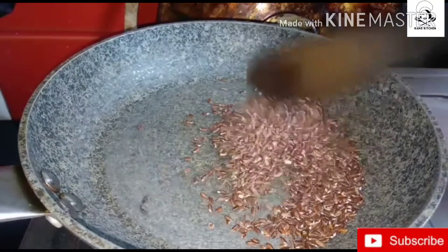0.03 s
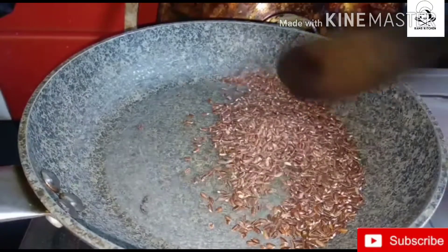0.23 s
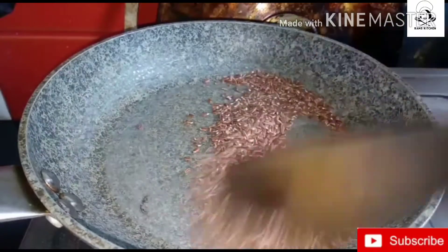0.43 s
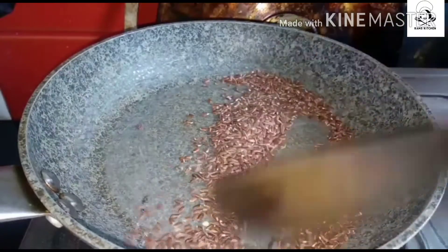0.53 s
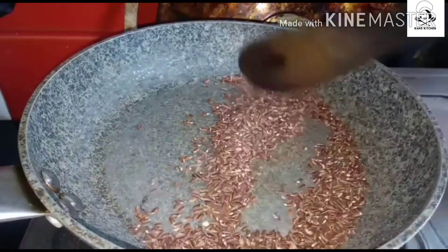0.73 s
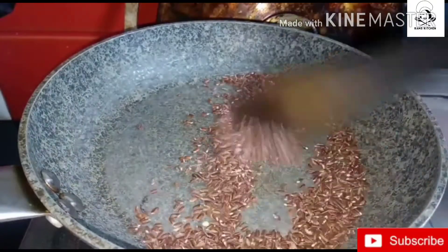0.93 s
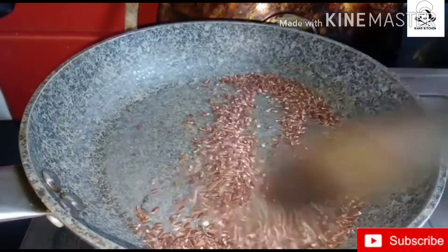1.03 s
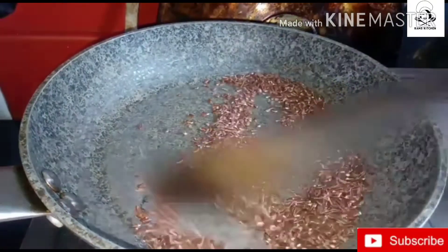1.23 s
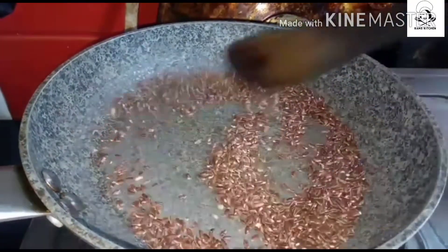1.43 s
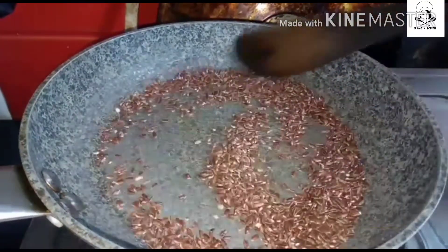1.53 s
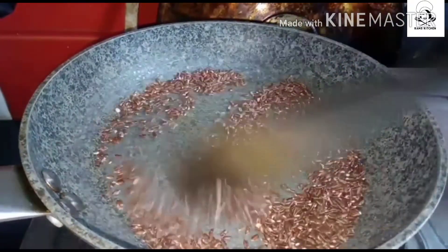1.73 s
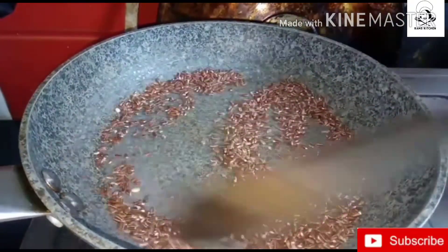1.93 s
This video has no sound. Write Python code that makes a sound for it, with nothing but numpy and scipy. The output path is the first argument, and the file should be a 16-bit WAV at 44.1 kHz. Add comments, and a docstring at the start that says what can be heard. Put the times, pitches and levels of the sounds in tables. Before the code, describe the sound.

A wooden spatula stirs dry grains in a metal pan, with gritty swishes and occasional knocks.

```python
"""Kitchen stove, close up: a wooden spatula stirs dry grains round a frying pan.
Each stroke sweeps a rush of tiny grain impacts over the metal while the blade scrapes the base,
at times squeaking or making one mode sing. Now and then the spatula knocks the ringing wall
or the damped base, and the pan rumbles on its support."""
import sys
import numpy as np
from scipy import signal
from scipy.fft import rfft, irfft
from scipy.io import wavfile
from scipy.ndimage import uniform_filter1d

SR = 44100
rng = np.random.default_rng(int(sys.argv[2]) if len(sys.argv) > 2 else 0)


def output_pcm(signal):
    """Save a mono or channel-first signal as 16-bit PCM at the path in sys.argv[1].

    Samples are clipped to [-1, 1] before scaling.
    """
    pcm = np.clip(np.atleast_2d(signal).T, -1, 1) * 32767
    wavfile.write(sys.argv[1], SR, np.round(pcm).astype(np.int16))


N = 88200
T = np.arange(N) / SR
HZ = np.fft.rfftfreq(N, 1 / SR)
FRICTION_RISE_S = 0.0079


def amp(db):
    """Decibels to gain."""
    return 10 ** (np.asarray(db) / 20)


def unit(x):
    """Scale to unit rms."""
    return x / np.sqrt(np.mean(x ** 2) + 1e-20)


def read(points, hz, column=1):
    """Interpolate a table column over log frequency."""
    columns = np.transpose(points)
    return np.interp(np.log(hz + 1), np.log(columns[0] + 1), columns[column])


def add(mix, start_s, sound):
    """Mix a sound in at start_s."""
    part = mix[max(round(start_s * SR), 0):][:len(sound)]
    part += sound[:len(part)]


def colour(x, gain):
    """Minimum-phase filter from a gain per bin; unit rms out."""
    cepstrum = irfft(np.log(np.maximum(gain, 1e-5)), N)
    fold = 1 + np.sign(N / 2 - np.arange(N))
    fold[0] = 1
    return unit(irfft(rfft(x) * np.exp(rfft(cepstrum * fold)), N))


def peaks(modes, order):
    """Gain per bin of a set of resonances; higher order, steeper skirts."""
    power = sum(amp(db) ** 2 / (1 + abs(2 * (HZ - hz) / width_hz) ** order) for hz, width_hz, db in modes)
    return np.sqrt(power)


def clicks(rate_per_s, spread_db):
    """Random impulses of uneven size."""
    size = amp(spread_db * np.minimum(rng.exponential(1, N), 4))
    return size * rng.choice([-1., 1.], N) * (rng.random(N) < rate_per_s / SR)


def decay(t, t60_s):
    """Unity until t = 0, then 60 dB down per t60_s."""
    return amp(-60 * np.maximum(t, 0) / t60_s)


def push(start_s, length_s, rise_s, t60_s):
    """Envelope of one push: rise, hold, decay."""
    return np.clip((T - start_s) / rise_s, 0, 1) * decay(T - start_s - length_s, t60_s)


def hum(gain):
    """Random vibration of narrow resonances at an even level."""
    phase = np.exp(2j * np.pi * rng.random(len(HZ)))
    x = unit(irfft(gain * phase, N))
    return x / np.sqrt(uniform_filter1d(x ** 2, size=1800))


def air():
    """Faint steady room noise."""
    # noise spectrum: freq_hz, density_db
    spectrum = [(20, -15), (100, -11.5), (400, -12.5), (1000, -16), (4000, -22.5), (16000, -23.5)]
    return amp(-76.5) * colour(rng.standard_normal(N), amp(read(spectrum, HZ)))


def reflections(x):
    """Short reverb off tiled walls."""
    tail = clicks(2000, spread_db=-5) * decay(T, t60_s=0.22) * (T > 0.008)
    return signal.fftconvolve(x, tail / np.linalg.norm(tail))[:N]


def support():
    """The pushed pan judders on the stove; each shift favours the low modes near its centre pitch."""
    # pan shifts: start_s, length_s, thud_db, rumble_db, centre_hz
    shifts = [(0, 0.018, -60.5, -50.5, 360), (.258, 0.065, -41, -39.5, 367),
              (0.351, 0.025, -45.5, -43.5, 417), (0.901, 0.027, -59, -52, 426),
              (0.959, 0.011, -55, -55.5, 272), (1.16, 0.052, -77.5, -52, 594),
              (1.261, 0.067, -75, -49.5, 520), (1.293, 0.01, -55.5, -44, 380), (1.327, 0.07, -68, -55, 176),
              (1.613, 0.042, -52, -47.5, 315), (1.685, 0.036, -81, -49.5, 370)]
    # lowest support modes: pitch_hz, width_hz, level_db
    thud_modes = [(86, 6, 0), (97, 8, -6), (129, 6, -10)]
    # upper support modes: pitch_hz, width_hz, level_db
    rumble_modes = [(186, 12, -3), (205, 10, -9), (267, 8, 2), (286, 14, -2), (418, 24, -8), (500, 12, -4),
                    (545, 10, -4), (690, 45, -14)]
    rise_s = 0.0081
    thud = hum(peaks(thud_modes, order=4))
    rumble_gain = peaks(rumble_modes, order=3)
    out = np.zeros(N)
    for start_s, length_s, thud_db, rumble_db, centre_hz in shifts:
        offset_octaves = np.log2((HZ + 1) / centre_hz)
        rumble = hum(rumble_gain / (1 + offset_octaves ** 2))
        out += amp(thud_db) * thud * push(start_s, length_s, rise_s, t60_s=0.23)
        out += amp(rumble_db) * rumble * push(start_s, length_s, rise_s, t60_s=0.27)
    return out


def singing():
    """Blade friction briefly feeds single modes of the pan or its support."""
    # driven modes: start_s, length_s, pitch_hz, level_db
    tones = [(0, 0.074, 182, -52.5), (0.105, 0.021, 5890, -46.5), (.124, 0.013, 2160, -54),
             (0.272, 0.085, 275, -39), (0.366, 0.081, 2150, -55), (0.502, 0.034, 2163, -57),
             (0.691, 0.031, 1391, -48), (0.774, 0.043, 3265, -63.5), (0.977, 0.022, 783, -51),
             (1.161, 0.052, 253, -51), (1.262, 0.028, 2193, -52.5), (1.706, 0.029, 2200, -55),
             (1.893, 0.0068, 2893, -46.5)]
    width_hz = 21
    out = np.zeros(N)
    for start_s, length_s, pitch_hz, level_db in tones:
        tone = hum(peaks([(pitch_hz, width_hz, 0)], order=3))
        out += amp(level_db) * push(start_s, length_s, FRICTION_RISE_S, t60_s=0.083) * tone
    return out


def squeaks():
    """A hoarse resonance glides as the contact point moves along the blade."""
    # blade edge on the curved wall: start_s, length_s, first_hz, last_hz, level_db
    glides = [(0.544, 0.013, 2350, 1980, -55.5), (0.642, .034, 1500, 2214, -49.5)]
    width_hz = 210
    out = np.zeros(N)
    for start_s, length_s, first_hz, last_hz, level_db in glides:
        pitch_hz = np.interp(T, [start_s, start_s + length_s], [first_hz, last_hz])
        carrier = np.exp(2j * np.pi * np.cumsum(pitch_hz) / SR)
        noise = rng.standard_normal(N) + 1j * rng.standard_normal(N)
        roughness = signal.lfilter(*signal.butter(2, width_hz / 2, fs=SR), noise)
        envelope = push(start_s, length_s, FRICTION_RISE_S, t60_s=0.061)
        out += amp(level_db) * envelope * unit((roughness * carrier).real)
    return out


def scrapes():
    """The blade slips over the base in tiny jerks, which rasp and set the base droning."""
    # blade strokes: start_s, length_s, rasp_db, drone_db
    strokes = [(0, 0.043, -59, -64.5), (0.104, 0.0098, -77, -98), (0.371, 0.085, -57, -56),
               (0.524, 0.047, -63.5, -109), (0.634, 0.049, -52, -86), (0.703, 0.014, -52, -77),
               (0.919, 0.038, -50, -80), (0.955, 0.069, -50.5, -71.5), (1.266, 0.1, -50, -84),
               (1.395, 0.045, -61, -50), (1.639, 0.03, -50, -55), (1.691, 0.065, -47.5, -49.5),
               (1.778, 0.071, -59.5, -91), (1.905, 0.0073, -51.5, -74)]
    # rasp spectrum: freq_hz, density_db
    rasp_spectrum = [(200, -10), (1000, -25.5), (1400, 6), (1800, -5.5), (2170, 11), (2450, -4),
                     (2900, 3.5), (3600, -2), (7000, -30), (16000, -64)]
    # droning base modes: pitch_hz, width_hz, level_db
    drone_modes = [(786.7, 42, 21), (1320, 34, -30)]
    slips = clicks(rate_per_s=980, spread_db=2)
    rasp = colour(slips, amp(read(rasp_spectrum, HZ)))
    drone = colour(slips, peaks(drone_modes, order=4))
    out = np.zeros(N)
    for start_s, length_s, rasp_db, drone_db in strokes:
        envelope = push(start_s, length_s, FRICTION_RISE_S, t60_s=0.14)
        out += envelope * (amp(rasp_db) * rasp + amp(drone_db) * drone)
    return out


def knocks(blows, modes):
    """Each blow: sharp crack, dense wooden clack, ringing modes. The contact sets the excited band."""
    # wooden clack: freq_hz, density_db, t60_s
    clack_spectrum = [(102, 4, 0.61), (388, 7.5, 0.18), (770, -6.5, 0.31), (1350, -0.5, 0.25),
                      (2640, -3, 0.033), (3800, -3.5, .08), (7560, -8, 0.096), (8400, -13, 0.04),
                      (15700, 0, 0.056)]
    contact_s = 0.00059  # wood compresses before the modes ring fully
    t = T[:N // 3]
    ring = sum((-1) ** k * amp(db) * decay(t, t60_s) * np.sin(2 * np.pi * hz * t)
               for k, (hz, db, t60_s) in enumerate(modes))
    ring *= np.minimum(t / contact_s, 1)
    clack_bins = rfft(colour(rng.standard_normal(N), amp(read(clack_spectrum, HZ))))
    edges_hz = np.geomspace(60, 17000, 13)
    bands = []
    for low_hz, high_hz in zip(edges_hz, edges_hz[1:]):
        band = irfft(clack_bins * (HZ >= low_hz) * (HZ < high_hz), N)
        t60_s = read(clack_spectrum, np.sqrt(low_hz * high_hz), column=2)
        bands.append((band, decay(t, t60_s)))
    out = np.zeros(N)
    for start_s, ring_db, clack_db, crack_db, free_ring_s, low_hz, high_hz in blows:
        offset = rng.integers(N // 2)
        clack = sum(band[offset:offset + len(t)] * envelope for band, envelope in bands)
        blade_damping = decay(t - free_ring_s, t60_s=0.126)
        crack = rng.standard_normal(len(t)) * decay(t, t60_s=0.032)
        blow = amp(ring_db) * ring * blade_damping + amp(clack_db) * clack + amp(crack_db) * crack
        blow = signal.sosfilt(signal.butter(5, low_hz, "high", fs=SR, output="sos"), blow)
        add(out, start_s, signal.lfilter(*signal.butter(4, high_hz, fs=SR), blow))
    return out


def wall_knocks():
    """The spatula strikes the pan wall, which rings until the blade damps it."""
    # wall blows: start_s, ring_db, clack_db, crack_db, free_ring_s, low_hz, high_hz
    blows = [(.2405, -48, -61, -48, 0.0074, 247, 2000), (.2470, -27.5, -26.5, -31.5, 0.12, 526, 7670),
             (.265, -35, -30, -34, 0.041, 290, 2980), (1.1445, -34, -29.5, -62, .11, 1033, 2480)]
    # wall modes: pitch_hz, level_db, t60_s
    modes = [(400, -28, 0.15), (666, -10, .15), (772, -4.5, 0.15), (963, -10, 0.58), (1010, -3.5, 0.03),
             (1159, -9, 0.32), (1390, -14.5, 0.28), (1512, -16.5, 0.11), (1733, -15, 0.36),
             (1997, -2.5, 0.14), (2634, -15.5, 0.39), (2870, 0.5, 0.031), (5240, -12, .1),
             (10000, -14, .06)]
    return knocks(blows, modes)


def base_knocks():
    """The spatula strikes the base; the blade keeps the ring short."""
    # base blows: start_s, ring_db, clack_db, crack_db, free_ring_s, low_hz, high_hz
    blows = [(.3285, -21, -32.5, -48, .02, 2680, 12700), (.333, -14, -33, -47, .02, 2780, 5840),
             (.3420, -26, -26.5, -22.5, 0.0089, 416, 3020), (.8865, -73, -58.5, -46.5, .01, 200, 11300),
             (.9258, -55, -45.5, -39.5, .02, 1710, 6070), (.986, -49, -55, -42, 0.025, 705, 7500),
             (1.277, -36, -37, -46, .02, 2130, 14900), (1.415, -33.5, -42, -34, 0.023, 2000, 7000),
             (1.5812, -42, -60, -64, 0.0087, 404, 1380), (1.5885, -25, -37, -22.5, 0.018, 660, 2000),
             (1.686, -41, -39.5, -54, 0.012, 900, 3090)]
    # damped base modes: pitch_hz, level_db, t60_s
    modes = [(779, -2, 0.14), (1177, -13, 0.064), (1378, 5.5, 0.018), (1419, -11.5, 0.21),
             (1840, 0.5, 0.0067), (2130, 0.5, 0.016), (3320, -15.5, 0.033)]
    return knocks(blows, modes)


def grains():
    """Clumps of grains tumble on each other and on the metal, whose ring outlasts each rush."""
    # grain rushes: start_s, rise_s, length_s, rattle_db, hiss_db, ring_db
    rushes = [(-.02, 0.0081, 0.029, -56, -58.5, -56.5), (0.079, 0.0021, .008, -62.5, -67, -75),
              (0.096, 0.0073, 0.066, -54, -54, -62.5), (0.114, 0.018, 0.013, -48.5, -48.5, -48.5),
              (0.153, 0.014, 0.068, -63.5, -61.5, -76), (0.338, 0.0086, 0.11, -59, -58.5, -53),
              (0.45, 0.066, 0.059, -49, -48.5, -50.5), (0.522, .01, 0.027, -60, -55.5, -63),
              (0.611, 0.053, 0.082, -60.5, -54, -51), (0.683, 0.0049, .035, -54, -48.5, -53.5),
              (0.776, 0.063, 0.072, -56, -56, -76), (0.901, 0.022, 0.093, -63.5, -64, -56.5),
              (0.969, 0.0095, 0.057, -52, -54.5, -74), (1.04, 0.031, 0.062, -54.5, -57, -56),
              (1.133, 0.0095, 0.012, -51, -51, -54), (1.17, .01, 0.049, -77, -65, -65),
              (1.219, 0.013, .05, -61.5, -58.5, -57.5), (1.287, 0.0065, 0.07, -53.5, -57, -51.5),
              (1.349, 0.033, 0.095, -58, -56, -53), (1.445, 0.0059, 0.06, -52, -54.5, -70),
              (1.528, 0.022, 0.021, -62, -58, -72), (1.596, 0.048, 0.27, -56, -61, -56.5),
              (1.743, 0.018, 0.12, -61, -57.5, -58.5), (1.84, 0.026, 0.015, -62, -67, -62),
              (1.886, 0.0062, 0.008, -49, -45, -70)]
    # rattle spectrum: freq_hz, density_db
    rattle_spectrum = [(200, -20.5), (1000, -41.5), (1450, -14), (2200, -11), (2700, -1.5), (3800, -7),
                       (4700, 3), (6200, 1.5), (7400, -6), (8100, -17), (16000, -30.5)]
    # hiss spectrum: freq_hz, density_db
    hiss_spectrum = [(3000, -22.5), (7000, 3), (8200, -4.5), (8900, 2), (9600, -1.5), (11000, 2.5),
                     (13000, 0), (15700, -2.5)]
    # pan modes under the grains: pitch_hz, width_hz, level_db
    pan_modes = [(1455, 50, -3.5), (2166, 130, -1), (3133, 74, -11), (3257, 67, 1.5), (3783, 88, -3.5),
                 (4445, 91, 0.5), (4930, 67, -6.5), (5580, 32, 0), (6090, 100, -5), (6240, 110, -1.5),
                 (6710, 21, 0.5), (7520, 116, -7), (8830, 88, -9.5)]
    clump_db, clump_s = 2.5, 0.0091
    rattle_t60_s, hiss_t60_s, ring_t60_s = 0.17, 0.11, 0.38
    wander = unit(uniform_filter1d(rng.standard_normal(N), int(clump_s * SR) + 1))
    clumps = amp(clump_db * wander)
    layers = [(amp(read(rattle_spectrum, HZ)), rattle_t60_s),
              (amp(read(hiss_spectrum, HZ)), hiss_t60_s),
              (peaks(pan_modes, order=4), ring_t60_s)]
    out = np.zeros(N)
    for k, (gain, t60_s) in enumerate(layers):
        power = sum((amp(levels_db[k]) * push(start_s, length_s, rise_s, t60_s)) ** 2
                    for start_s, rise_s, length_s, *levels_db in rushes)
        impacts = clicks(rate_per_s=5000, spread_db=3.5) * clumps
        out += np.sqrt(power) * colour(impacts, gain)
    return out


def scene():
    """Grains, blade and pan in a quiet kitchen; mono."""
    pan = grains() + scrapes() + squeaks() + singing() + wall_knocks() + base_knocks()
    return (air() + pan + amp(-11) * reflections(pan) + support())[None]


def record(dry):
    """Steep low-pass band limit."""
    cutoff_hz = 15850
    taps = signal.firwin(511, cutoff_hz, window=("kaiser", 9), fs=SR)
    return signal.oaconvolve(dry, taps[None], "same")


dry = scene()
out = record(dry)
output_pcm(out)
```